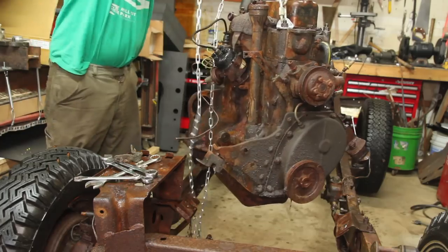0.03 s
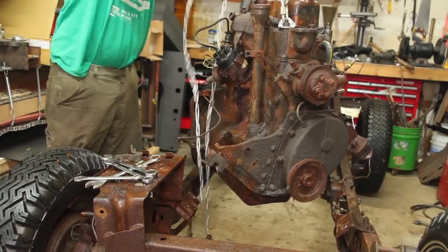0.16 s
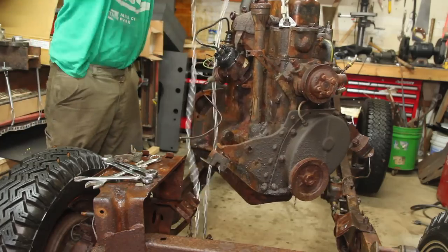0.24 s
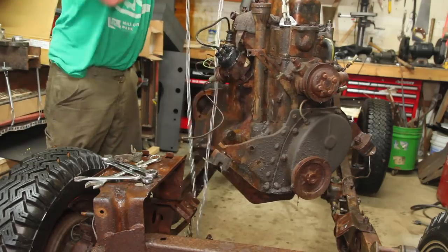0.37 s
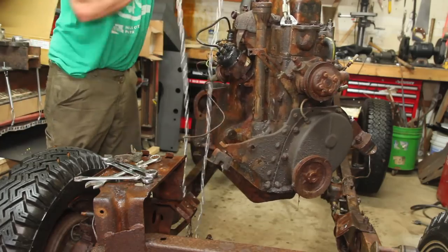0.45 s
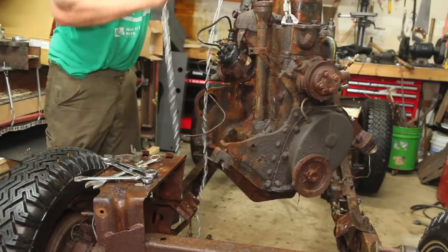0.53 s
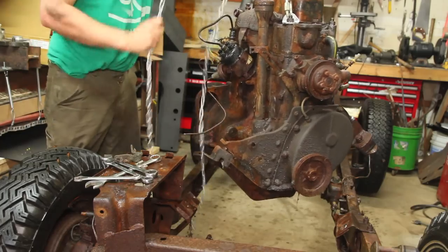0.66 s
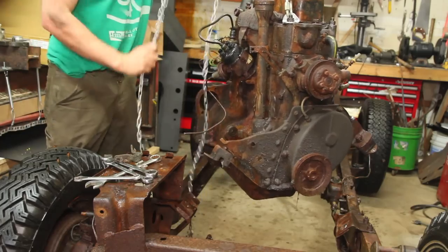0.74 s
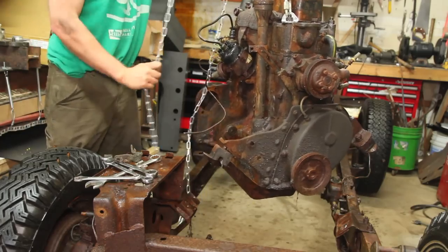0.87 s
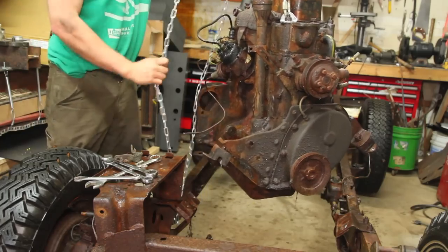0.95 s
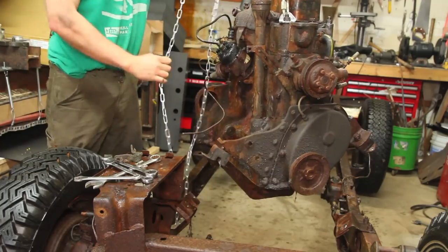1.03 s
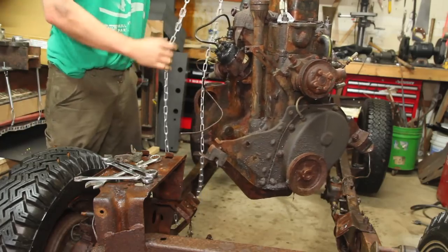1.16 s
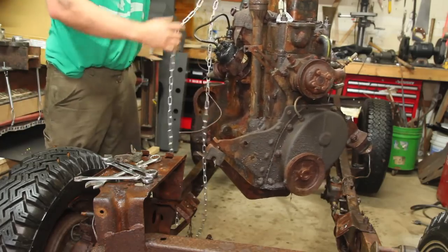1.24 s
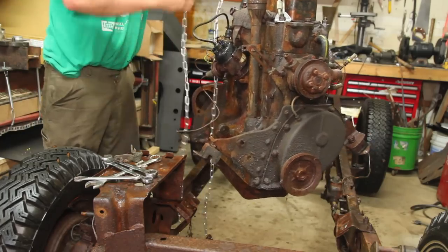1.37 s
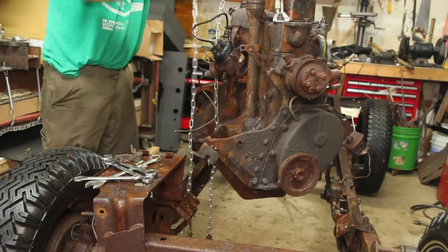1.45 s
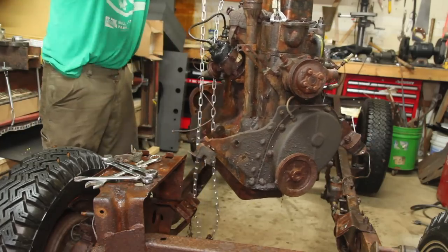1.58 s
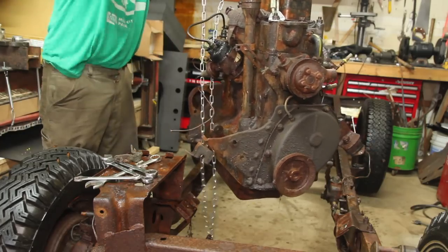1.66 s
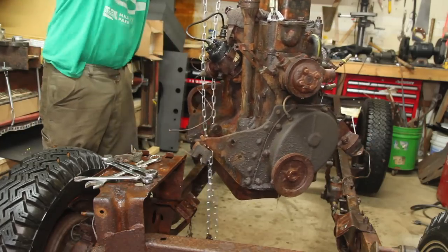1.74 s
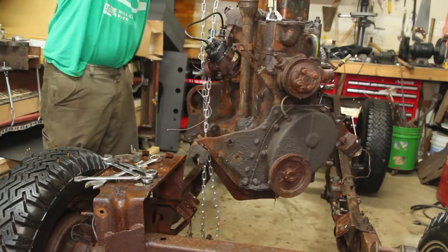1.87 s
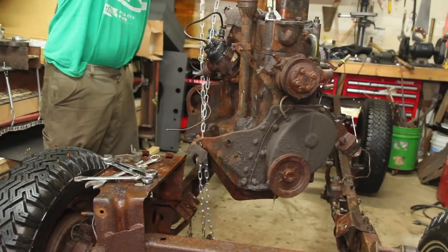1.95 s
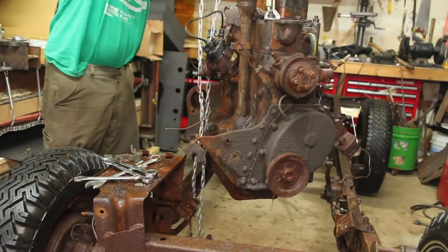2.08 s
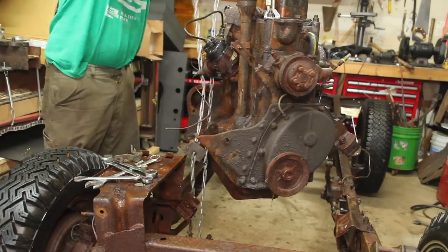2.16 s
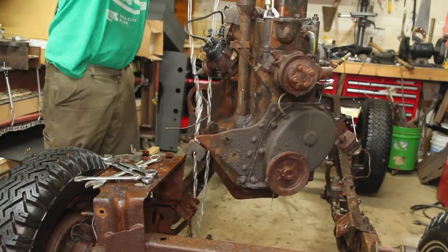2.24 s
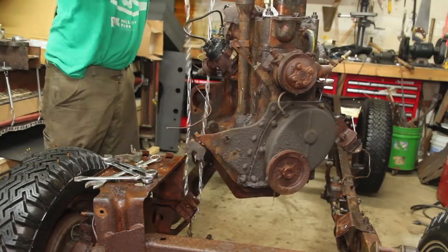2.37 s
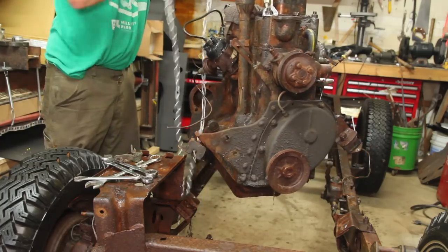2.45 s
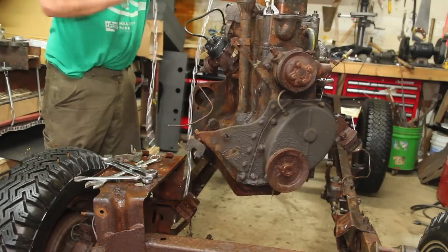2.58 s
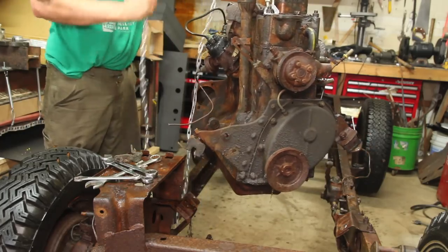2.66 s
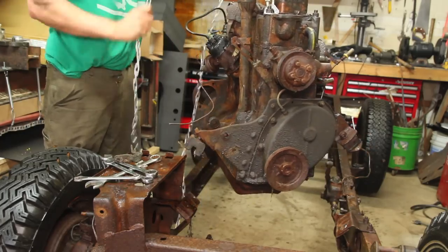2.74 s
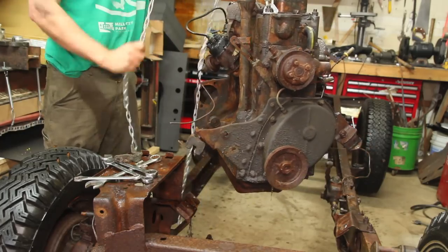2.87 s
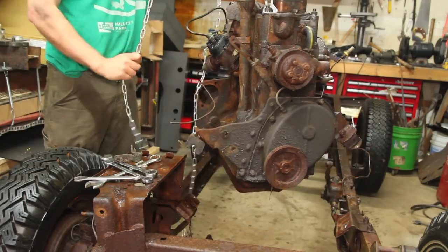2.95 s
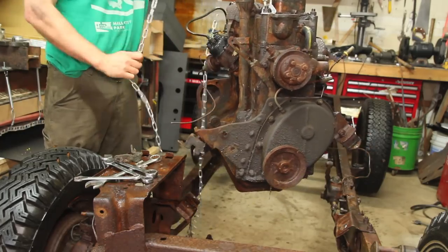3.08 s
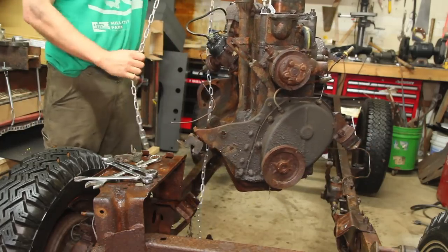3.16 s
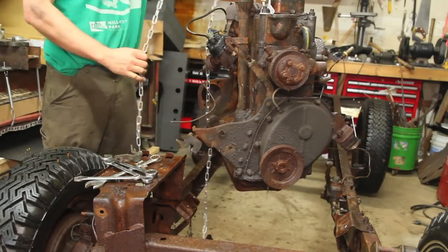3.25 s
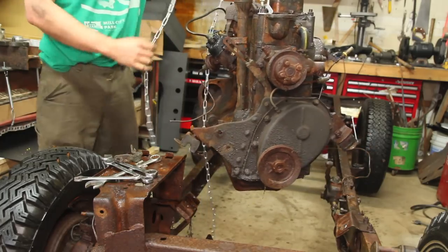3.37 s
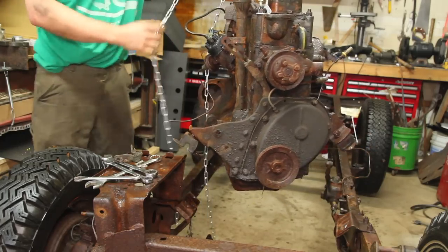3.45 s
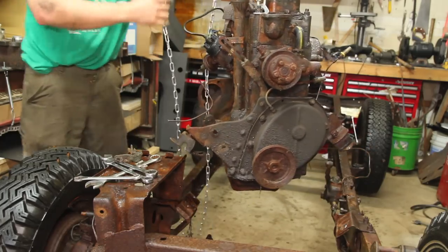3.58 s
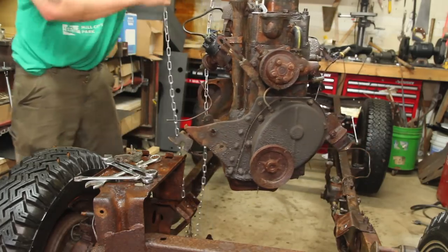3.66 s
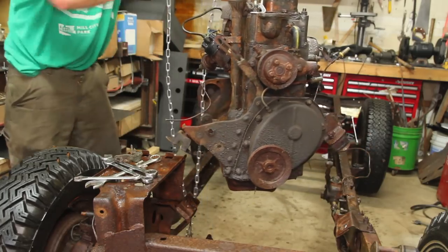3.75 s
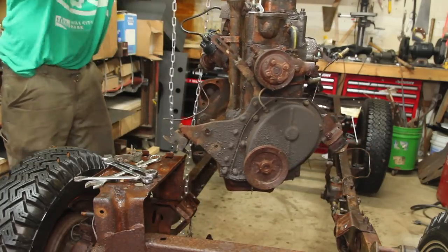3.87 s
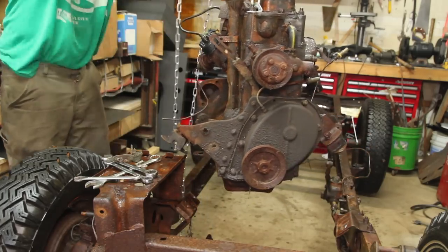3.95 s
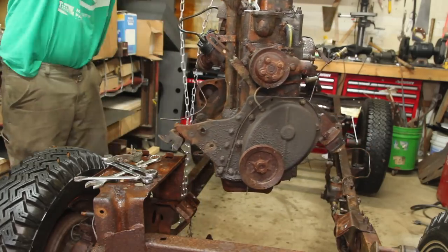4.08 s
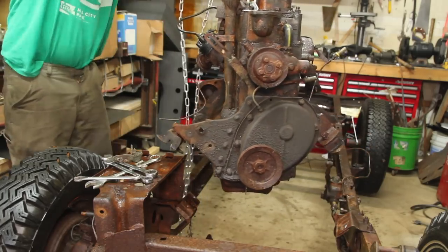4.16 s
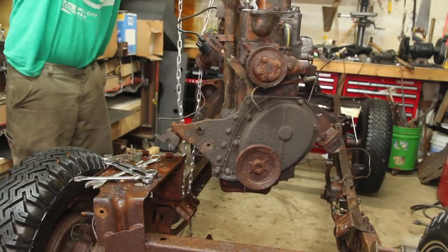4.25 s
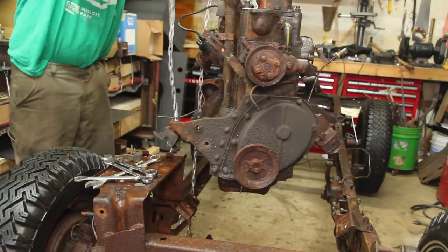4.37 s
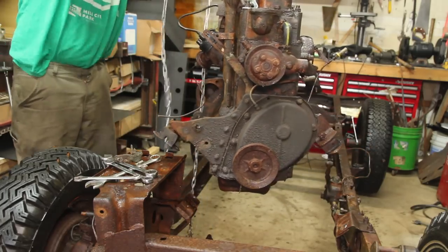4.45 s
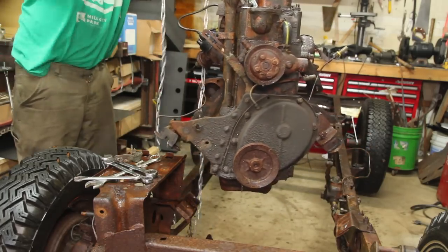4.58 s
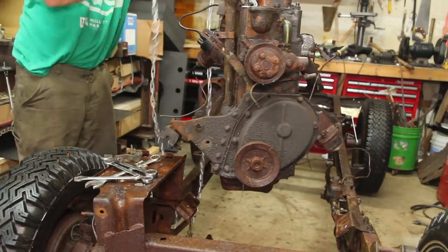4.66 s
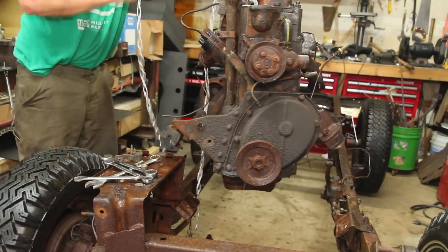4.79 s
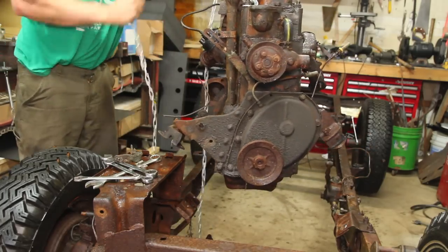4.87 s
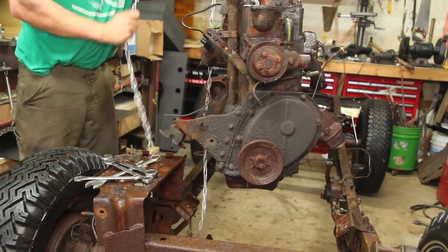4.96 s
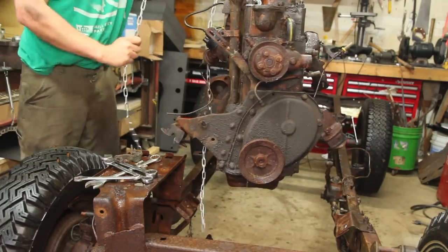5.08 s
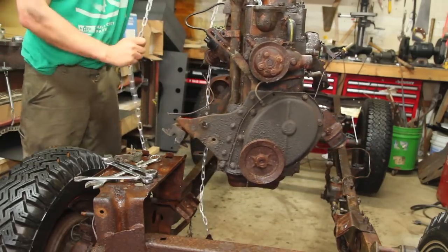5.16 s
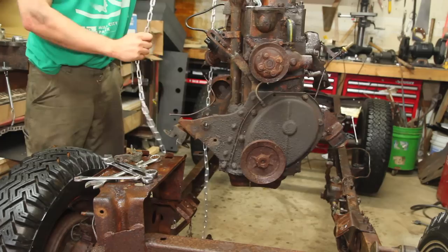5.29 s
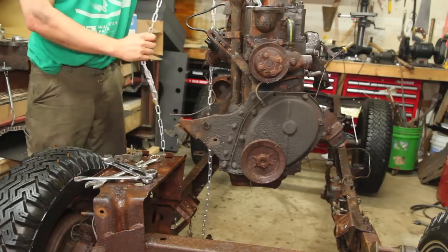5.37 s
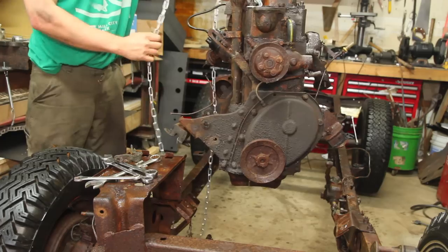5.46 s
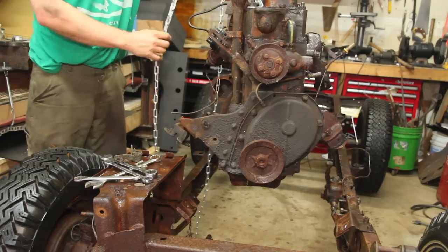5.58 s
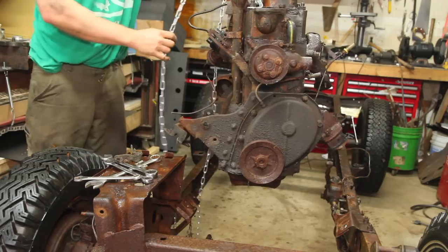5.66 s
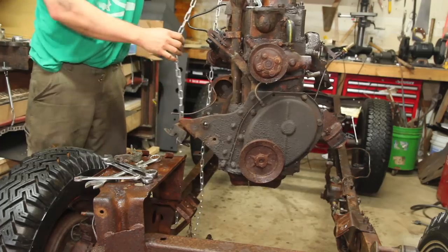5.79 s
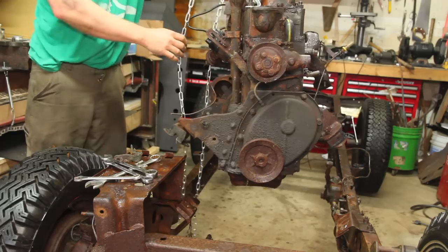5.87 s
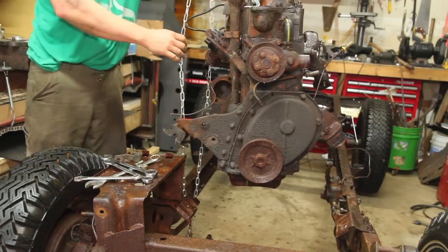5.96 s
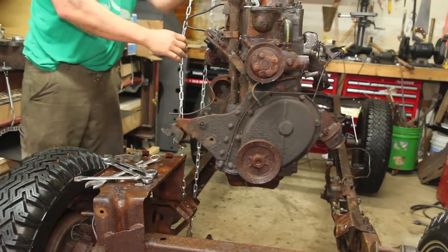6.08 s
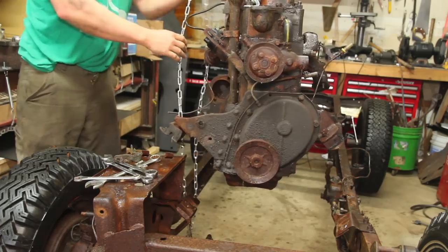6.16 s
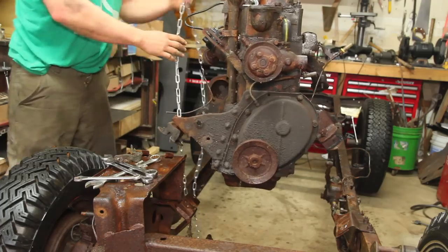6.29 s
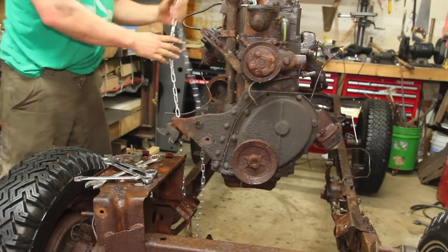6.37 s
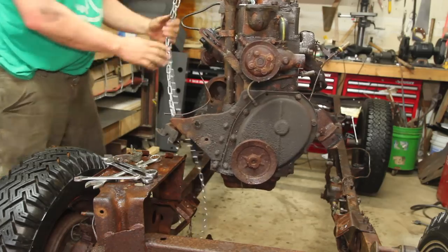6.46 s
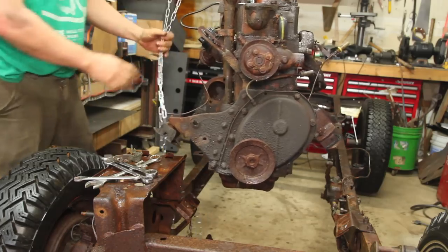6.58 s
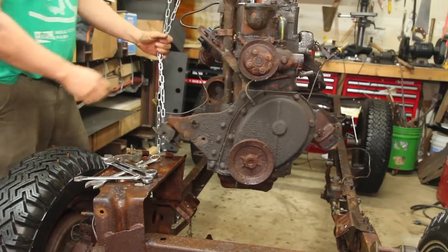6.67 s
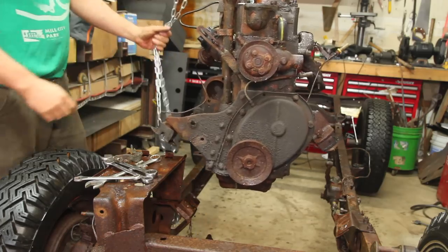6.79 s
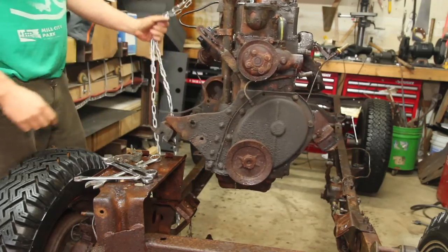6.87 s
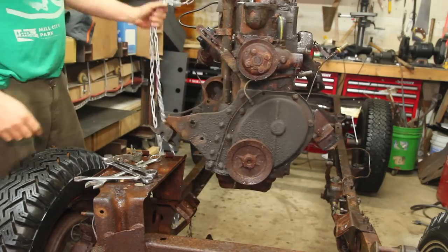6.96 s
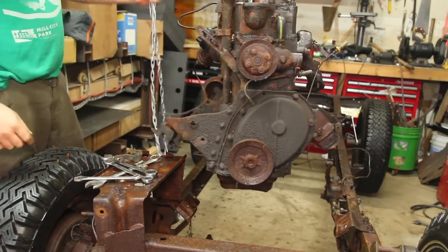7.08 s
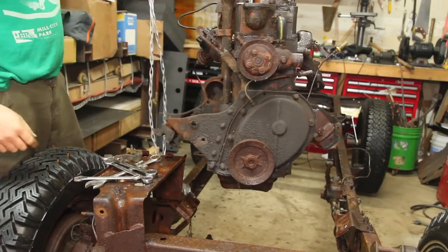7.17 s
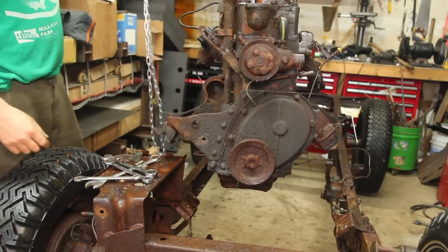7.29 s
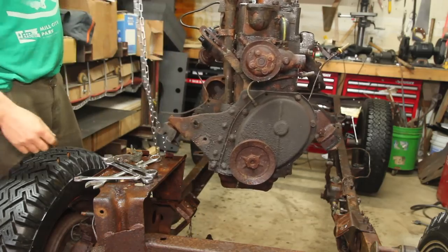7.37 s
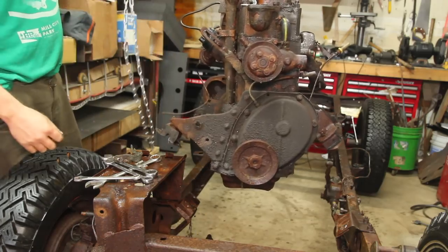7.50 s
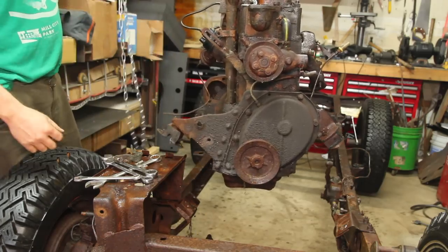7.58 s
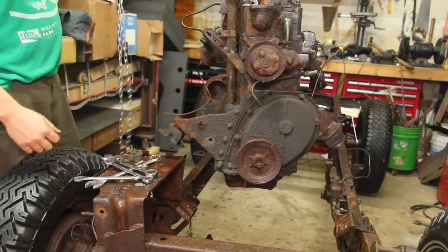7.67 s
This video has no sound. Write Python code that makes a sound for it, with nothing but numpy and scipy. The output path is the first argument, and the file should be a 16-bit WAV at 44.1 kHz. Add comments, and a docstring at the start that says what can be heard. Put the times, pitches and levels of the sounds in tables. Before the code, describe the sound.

In a reverberant workshop, a hand chain is hauled through a manual hoist in three loud, fast bursts of about a second each, links clacking and grinding over a low beam rumble. Between bursts, loose chain clinks, brushes and slaps a ringing steel frame, and the hoist ticks faintly. The last pause is longest, full of small chain rattles. The microphone is fairly close, with quiet room noise.

```python
"""In a workshop, a hand chain is hauled three times through a chain hoist.
Links clack into the pocket wheel: noise cracks and struck modes ring the hoist, over a bed of grinding.
The beam above rumbles and sways as resonant noise; quiet room noise carries a faint sine whine.
Slack chain slaps and brushes a ringing steel frame, its links clink, and the unloaded hoist ticks.
Short room reverberation surrounds hoist and chain."""
import sys
import numpy as np
from scipy import signal
from scipy.io import wavfile
from scipy.ndimage import uniform_filter1d

SR = 44100
rng = np.random.default_rng(int(sys.argv[2]) if len(sys.argv) > 2 else 0)


def wav_out(sig):
    """Save sig, one row per channel (or a flat mono array), as 16-bit PCM at SR to the path in sys.argv[1]."""
    wavfile.write(sys.argv[1], SR, np.round(np.clip(np.atleast_2d(sig).T, -1, 1) * 32767).astype(np.int16))


N = 340891  # samples

# Levels in the tables are relative: each source sets its own place in the mix.
# One table a haul: time_s, links_passed (over the wheel, rounded when used), blow_db, grind_db
HAULS = [
    [(0, -1, -30, -33), (.042, -0.5, -17, -35.5), (.1356, 1, -19, -40.5), (.1632, 2.5, -15, -41),
     (.1847, 3, -14, -36), (.2201, 4.5, -15, -33.5), (.3323, 12, -19, -23), (.527, 25, -16, -25),
     (.6514, 32.5, -16.5, -22.5), (.7273, 38, -18, -22), (.8204, 43, -19.5, -24.5), (.885, 45.5, -22, -32),
     (.97, 47.5, -42, -49), (1.15, 50, -60, -79)],
    [(2.1222, 0, -19.5, -54), (2.155, 1, -17.5, -41), (2.186, 2, -15, -37), (2.2087, 2.5, -15, -30),
     (2.2505, 4.5, -16, -28), (2.4076, 14, -18, -26), (2.5732, 23, -16, -26.5), (2.7707, 33, -17, -28.5),
     (2.867, 36.5, -14.5, -24), (2.9062, 38.5, -16.5, -25.5), (2.9647, 41, -15.5, -26.5),
     (3.0144, 43, -22.5, -39), (3.2, 44.5, -60, -66.5)],
    [(4.3421, 0, -21, -52.5), (4.4012, 1, -19, -36), (4.4322, 2, -18, -38), (4.4839, 4, -18.5, -26.5),
     (4.5454, 7, -18, -21.5), (4.6286, 12.5, -18.5, -21), (4.741, 17.5, -17, -25), (4.906, 26, -19, -24.5),
     (5.0159, 31, -16.5, -29.5), (5.068, 33, -16, -23), (5.126, 35, -20, -47), (5.1794, 36.5, -38, -47),
     (5.25, 36, -60, -51.5)],
]
# Hoist resonances under load: centre_hz, width_hz (nominal), level_db
LOADED_HOIST = [(2497, 280, -10), (3278, 130, -10.5), (4340, 330, -2), (5280, 180, -6), (5790, 260, 1),
                (6647, 96, -4), (7280, 200, -5), (8170, 290, -2.5), (8770, 54, -7.5), (8990, 80, -6),
                (9600, 67, -10.5), (10930, 370, -14), (12860, 300, -10), (13930, 350, -6), (14680, 250, -7)]
# Steel on steel, spectrum: freq_hz, level_db (per Hz)
CRACK_SPECTRUM = [(180, -34.5), (300, -13.5), (412, -13.5), (994, -8.5), (2740, -11.5), (2980, -8),
                  (4230, -9), (4830, -7.5), (5800, -7), (16000, -3)]
SEAT_JITTER_S, SEAT_UNEVEN_DB = .0015, 2  # no two links seat alike

# Blows that ring the frame: start_s, main_db, lower_db, upper_db
FRAME_BLOWS = [(0.055, -41.5, -37, -52.5), (.2554, -28.5, -36.5, -30), (.3724, -34, -27, -35),
               (0.4156, -35.5, -34.5, -34.5), (0.5297, -25, -38.5, -21.5), (.6444, -34, -30, -37),
               (.6894, -27.5, -37.5, -32), (.9167, -30, -58, -50), (0.9685, -29, -48.5, -39),
               (1.0214, -42, -38.5, -39.5), (1.1404, -62.5, -44.5, -53.5), (1.215, -36, -61, -56),
               (1.3443, -48, -45, -38), (1.3961, -59, -45.5, -64.5), (1.7641, -54.5, -49, -51),
               (2.0073, -63, -43, -60), (2.0942, -38.5, -42.5, -42.5), (2.2451, -41.5, -39.5, -29.5),
               (2.3033, -46.5, -32, -33.5), (2.5658, -41, -30.5, -24.5), (2.6315, -15, -51.5, -35),
               (2.6916, -27.5, -37, -38), (2.7652, -30, -37.5, -36.5), (2.8347, -29, -45, -28.5),
               (2.8901, -19.5, -51, -23), (2.943, -47, -43, -30.5), (3.0088, -30, -51, -47),
               (3.4124, -34, -54.5, -35), (3.46, -37.5, -61, -42), (3.538, -48, -44.5, -45),
               (3.9, -37, -35.5, -31), (3.9931, -33.5, -39, -35), (4.4044, -55.5, -38, -52),
               (4.4907, -33, -41, -32.5), (4.5325, -15, -46, -36), (4.5832, -24.5, -55, -40),
               (4.6745, -24.5, -50, -32.5), (4.7969, -21.5, -37.5, -31), (4.945, -33, -49.5, -35.5),
               (5.0369, -35, -34, -36.5), (5.2869, -31.5, -42, -30.5), (5.6605, -36, -56, -47),
               (5.7588, -35.5, -46, -43.5), (6.6591, -33, -43, -37), (6.731, -33, -42, -41),
               (6.7533, -31, -41, -43.5), (6.8174, -33, -45, -41), (6.8995, -44, -40, -44),
               (6.959, -52, -40, -41), (7.0222, -18, -42, -34), (7.0891, -55, -41.5, -46)]
# Frame modes: pitch_hz, level_db, t60_s
FRAME_MODES = [(520, -10, .12), (775, -7, .2), (850, -4, .24), (870, -4, .2), (960, -7, .15),
               (1050, -10, .08), (1072, 0, .17), (1097, -10, .08), (1205, -6, .12), (1263, -6, .12),
               (1370, -3, .15), (1560, -6, .1)]
# Each passing link taps the frame, relative to its blow: main_db, lower_db, upper_db
LINK_TAPS_DB = [-29, -30, -27]

# Resonances of the beam, then of its slow sway: centre_hz, width_hz (nominal), level_db
BEAM_MODES = [(27.8, 11, -5), (51.6, 15, -20), (82.6, 20, -3), (109.5, 5, -9), (140, 10.5, 1),
              (194.7, 14, -4), (233.5, 10, -6.5), (269.5, 55, -11.5)]
SWAY_MODES = [(10.3, 4, 3.5), (20, 10, -21.5)]
# Pulls on the beam and rebounds once the chain is let go: start_s, full_s, eased_s, rumble_db, sway_db
LOADS = [(.0, 0.048, 0.11, -40, -49), (.1, 0.21, 0.86, -35, -44), (1.0, 1.037, 1.096, -37.5, -44),
         (1.55, 1.633, 1.52, -50, -54), (1.75, 1.826, 1.83, -58, -50), (2.125, 2.235, 2.98, -35.5, -41.5),
         (3.02, 3.046, 3.11, -41, -50), (4.336, 4.51, 5.13, -36, -38.5), (5.26, 5.31, 5.36, -37.5, -36),
         (5.998, 6.423, 6.6, -55, -48)]
# Rumble left under the loads: time_s, level_db
RUMBLE_REST = [(0, -57.5), (4, -64.5), (6.8, -63), (7.73, -84)]
LOAD_RISE_DB, RUMBLE_FALL_DB_PER_S, SWAY_FALL_DB_PER_S = 18, 138, 13
SURGE_DB = 1.5
TUG_DB_PER_S, TUG_S = 5.5, 0.069  # tug height per second of pull, tug width

# Room noise spectrum: freq_hz, level_db (per Hz)
AIR_SPECTRUM = [(40, -18.5), (70, 1), (146, -11.5), (334, -0.5), (870, -6.5), (1220, -8.5), (4000, -16.5),
                (9000, -20), (16000, -26.5)]
AIR_DB, WHINE_HZ, WHINE_DB = -62, 1033, -69

# Link on link: start_s, blow_db, tick_db (relative to the blow)
CLINKS = [(.0189, -30, 6), (.2892, -19, -5), (.3775, -11, -5.5), (0.4785, -9, -5), (.7986, -20, 0),
          (.9991, -38, 8), (1.0794, -18.5, -19), (1.272, -43, -13), (1.3004, -31, -16),
          (1.3882, -39, -18.5), (1.4232, -35, -20.5), (1.4511, -44, -17.5), (1.6033, -44.5, -6),
          (1.633, -36, -15.5), (1.7414, -43, -13.5), (1.877, -31, -14), (1.8876, -29.5, -25.5),
          (1.9999, -40, -21), (2.1004, -29.5, -2), (2.2697, -24, -1), (2.7511, -24, -7), (3.3273, -47, -16),
          (3.4595, -43, -4), (3.7483, -30, -15), (3.7555, -27, -22.5), (3.8594, -54, 3), (3.9135, -42, -4),
          (3.9699, -40, -13.5), (4.0272, -39, -16), (4.1654, -39.5, -18), (4.1849, -36.5, -19),
          (4.342, -23, 7), (5.0429, -24, -5.5), (5.1267, -21, 8), (5.3048, -41.5, 6), (5.676, -48.5, -21),
          (5.8046, -51, -2), (5.8885, -61, 12), (6.1619, -45, -19), (6.2941, -37, -10), (6.331, -44, -16.5),
          (6.346, -27.5, -16), (6.4044, -33.5, -5), (6.504, -44.5, -11.5), (6.567, -50, 3),
          (6.5777, -40.5, 10), (6.6792, -40.5, 8), (6.7311, -36, -8.5), (6.8658, -34, 0), (6.8922, -28, -9),
          (6.9431, -32, -16.5), (6.979, -33, -8.5), (7.0194, -34, 2.5), (7.1132, -23, -12.5),
          (7.22, -36, -13), (7.2469, -26.5, -14), (7.443, -42, -15), (7.4634, -38, -22), (7.4781, -20, -30),
          (7.5499, -42, -8.5), (7.6585, -44.5, -19), (7.7059, -39, -16)]
# Link modes: centre_hz, level_db, t60_s
LINK_MODES = [(15100, -8, .04), (15270, -3, .07), (15350, -4, .09), (15480, 3, .015), (15620, -3, .07),
              (15710, -5, .07)]
# Contact tick of a clink, spectrum: freq_hz, level_db (per Hz)
CLINK_TICK_SPECTRUM = [(3000, -26.0), (8000, -1.0), (15000, -1.5)]
# Small touches: level relative to the clink or seating blow, time constant, and level at rest
AFTER_CLINK_DB, AFTER_CLINK_S, AFTER_SEAT_DB, AFTER_SEAT_S, REST_DB = -9, .025, -22.5, .03, -69

# Slack chain on the frame: start_s, blow_db, treble_db and thud_db (relative to the blow), decay_s
SLAPS = [(1.0186, -27, -1, -10, 0.028), (1.2133, -31, -0.5, -22, 0.014), (1.3428, -38.5, -13, -21, 0.015),
         (1.5803, -32, -1.5, -16, 0.0075), (1.7596, -42.5, -22.5, -19, 0.024),
         (1.842, -48, 2, -17.5, 0.0083), (2.0934, -32.5, 0, -16.5, 0.022), (3.277, -41, 4.5, -29, 0.01),
         (3.371, -46.5, 7.5, -18.5, 0.015), (3.4065, -40, -15, -27.5, 0.044),
         (3.447, -33, -4.5, -24, 0.0184), (3.5038, -34.5, 1, -24, 0.017), (3.537, -38, 1.5, -22.5, 0.015),
         (3.8878, -35.5, 5.5, -33, 0.018), (3.907, -22.5, -18, -36, 0.01), (3.99, -34, -12, -18.5, 0.019),
         (4.264, -36.5, -23.5, -34, 0.017), (4.3124, -35, 1, -19, 0.034), (5.2755, -38, 5, -29, 0.0116),
         (5.2812, -27, 12, -26, 0.013), (5.2914, -25, -2, -13, 0.012), (5.3144, -30, -9, -7, 0.013),
         (5.5333, -39.5, 0, -22, 0.021), (5.657, -41, -25.5, -23, 0.016), (5.758, -41, -22.5, -28, 0.0147),
         (6.302, -45.5, -18, -19, 0.023), (6.349, -48, -5, -8, 0.015), (6.408, -59.5, 3.5, -8.5, 0.013),
         (6.654, -30.5, 1, -29, 0.0136), (6.6797, -27, 2.5, -32, 0.013), (6.728, -23, -10, -32, 0.016),
         (6.832, -34.5, 0, -14, 0.013), (6.8681, -37, -0.5, -8.5, 0.013), (6.8935, -34.5, -4, -13, 0.01),
         (6.9485, -41, -9, -20.5, 0.015), (6.986, -33.5, -5, -26, 0.017), (7.0184, -21, 5.5, -37, 0.016),
         (7.034, -24, -23.5, -37, 0.019), (7.0872, -28, 3.5, -40, 0.021), (7.12, -40, 0, -32.5, 0.015),
         (7.2424, -54, -1, -17, 0.021)]
# Dull body, bright edge and landing weight of the chain, spectra: freq_hz, level_db (per Hz)
BODY_SPECTRUM = [(180, -39), (300, -29), (520, -27.5), (830, -11.5), (1070, -10), (1900, -11.5),
                 (2700, -9.5), (3300, -11), (4500, -10), (7000, -23.5), (16000, -41.5)]
EDGE_SPECTRUM = [(1500, -54), (3000, -7), (6000, 3.5), (9000, 0), (13000, -10), (16000, -5)]
THUD_SPECTRUM = [(120, -36), (250, -5), (520, 3.5), (750, -3), (1200, -41)]
# Thin edges of the frame, modes: centre_hz, level_db, t60_s
FLANGE_MODES = [(2260, -6, .05), (2590, 0, .06), (2820, 0, .06), (3500, -4, .05), (4290, -3, .05),
                (4650, -2, .05), (5080, -4, .04), (5900, -4, .04), (6550, -6, .04), (7500, -8, .04)]
# One table a pause, chain brushing the frame: time_s, level_db, treble_db (relative to level)
DRAG = [
    [(.9, -39, 2), (1.0, -33, -6), (1.05, -34.5, -5), (1.2, -51.5, -11), (1.26, -45.5, -12),
     (1.42, -58.5, -8), (1.72, -63, -14), (2.09, -49.5, -12)],
    [(3.0, -49, 19), (3.04, -53, 21), (3.126, -54, 0), (3.3, -62, -9), (3.53, -64, 8), (3.74, -70, -7),
     (4.02, -68, 2), (4.13, -63, -30), (4.3, -60, 10)],
    [(5.15, -41, 5), (5.26, -42, -1.5), (5.37, -58, 14), (5.53, -65, -10), (5.7, -46.5, -24),
     (5.91, -61.5, -7), (6.26, -77, -13), (6.5, -61, -12), (6.82, -46.5, -14), (7.03, -43.5, 1),
     (7.24, -70.5, 11), (7.5, -77, -3)],
]

# Knocks in the unloaded hoist: start_s, blow_db, upper_db (upper modes, relative to the blow)
TICKS = [(1.6094, -54.5, -10.5), (1.759, -51.5, -22.5), (1.783, -43, -21), (1.9582, -40, -9),
         (2.01, -46, -26), (2.0385, -39.5, -26), (3.1, -42, -15), (3.2076, -43, -18), (3.242, -50, -14),
         (3.691, -50, -14), (3.7933, -53, -15), (4.2188, -51.5, -15.5), (4.24, -36.5, -18),
         (5.8285, -44, -5), (5.875, -41.5, -3), (6.075, -44, -13), (6.132, -50.5, -6), (6.2295, -47, -6.5),
         (6.3345, -51.5, -10), (6.4796, -51, -12.5), (6.5783, -59, 7)]
# Groups of close modes in the idle hoist: centre_hz, level_db, t60_s
IDLE_HOIST = [(2180, -14, .06), (2650, -12, .06), (3680, -8, .06), (4230, -1, .07), (4540, -1, .07),
              (4950, -4, .06), (5330, -4, .05), (6650, -3, .12), (7700, -5, .07), (8200, -2, .09),
              (9100, -4, .09), (9490, -4, .09), (11250, -1, .09), (13700, -8, .06)]
# Click of a knock, spectrum: freq_hz, level_db (per Hz)
KNOCK_CLICK_SPECTRUM = [(1500, -15.5), (4300, 0.5), (5500, 1), (7000, -16.0), (15000, -23.0)]
# One table a pause, the swinging chain stirring the idle hoist: time_s, level_db
STIR = [
    [(1.1, -62), (1.374, -75), (1.428, -80), (1.656, -78), (1.778, -71), (2.046, -65.5), (2.1, -56)],
    [(3.05, -54), (3.096, -38), (3.222, -66.5), (3.39, -61), (3.514, -48), (3.72, -74.5), (3.9, -75.5)],
    [(4.15, -77), (4.282, -72), (4.33, -57)],
    [(5.5, -63.5), (5.61, -68), (5.748, -76), (5.882, -85), (6.076, -78), (6.158, -76), (6.28, -80),
     (6.6, -70)],
]

# Workshop reverberation: freq_hz, t60_s
SHOP_DECAY = [(250, 0.43), (1000, 0.37), (4000, 0.3), (9000, 0.29), (15000, 0.19)]
CEILING, BAND_LIMIT_HZ = 0.51, 15850  # ceiling as a full-scale fraction


def gain_of(db):
    """Turns dB into an amplitude factor."""
    return 10 ** (np.asarray(db) / 20)


def evened(x):
    """Scales to rms 1."""
    return x / np.sqrt(np.mean(x ** 2) + 1e-20)


def curve(rows, column=1):
    """Fades along a dB column of a table, at -150 dB outside its times."""
    rows = np.array(rows)
    return gain_of(np.interp(np.arange(N) / SR, rows[:, 0], rows[:, column], -150, -150))


def coloured(x, spectrum):
    """Shapes a sound with a causal minimum-phase filter of unit energy."""
    hz = np.abs(np.fft.fftfreq(4096, 1 / SR))
    f, db = np.transpose(spectrum)
    shape_db = np.interp(np.log(hz + 1), np.log(f + 1), db)
    log_gain = np.log(gain_of(np.maximum(shape_db, -100)))
    taps = np.fft.ifft(np.exp(np.conj(signal.hilbert(log_gain)))).real[:2048]
    return signal.oaconvolve(x, taps / np.linalg.norm(taps))[:N]


def ring(x, hz, t60):
    """Excites one decaying mode: an impulse of 1 rings with a height near 1."""
    radius = 10 ** (-3 / (abs(t60) * SR))
    turn = 2 * np.pi * hz / SR
    return signal.lfilter([np.sin(turn)], [1, -2 * radius * np.cos(turn), radius ** 2], x)


def as_modes(peaks):
    """Turns resonances into modes: a wide one dies faster and needs a harder strike."""
    return [(hz, db + 10 * np.log10(width / 100), 2.67 / width) for hz, width, db in peaks]


def split(modes, spread):
    """Makes each mode three uneven neighbours, since a metal part never rings on one clean tone."""
    return [(hz * (1 + spread * step), db, t60) for hz, db, t60 in modes for step in (-1, .15, .8)]


def struck(s, size, modes, uneven_db, swell_s=0.00097):
    """Lands every blow on another spot, sharing its force among the modes anew; the ring takes time to build."""
    at = np.clip((np.asarray(s) * SR).astype(int), 0, N - 1)
    share = np.clip(rng.standard_normal((len(at), len(modes))), -2, 2)
    size = np.asarray(size).reshape(len(at), -1) * np.ones(share.shape)
    out = np.zeros(N)
    for k, (hz, db, t60) in enumerate(modes):
        sign = np.sign(share[:, k - 1])
        blows = np.bincount(at, size[:, k] * sign * gain_of(uneven_db * share[:, k]), N)
        swell = 2 * np.log(1000) / (swell_s * SR) * ring(blows, hz, swell_s)
        out += gain_of(db) * ring(swell, hz, t60)
    return out


def touches(per_s, spread_db):
    """Scatters random times and sizes of small contacts."""
    s = np.flatnonzero(rng.random(N) < per_s / SR) / SR
    return s, gain_of(spread_db * np.minimum(rng.exponential(1, len(s)), 4))


def bursts(s, size, decay_s):
    """Starts noise at each blow; its amplitude dies with its own time constant."""
    t, power = np.arange(4000) / SR, np.zeros(N + 4000)
    attack = np.minimum(t / 0.0013, 1)
    for start, height, decay in zip(s, size, decay_s * np.ones(len(s))):
        power[int(start * SR):][:4000] += height ** 2 * np.exp(-2 * t / max(decay, .001)) * attack
    return np.sqrt(power[:N]) * rng.standard_normal(N)


def fading(s, db, decay_s):
    """Power that jumps at each blow and dies with one amplitude time constant."""
    power = np.bincount((s * SR).astype(int), gain_of(2 * db), N)
    return signal.lfilter([1], [1, -np.exp(-2 / (abs(decay_s) * SR))], power)


def seated():
    """Times (s) and levels (dB) of the links dropping into the pockets of the wheel."""
    hauls = []
    for haul in HAULS:
        s, passed, db, _ = np.transpose(haul)
        passed = np.round(passed)
        link = np.arange(60)
        chance = rng.standard_normal((60, 2))
        chance *= np.minimum(link / 4, 1)[:, None]  # the first slow links seat cleanly
        seat_s = np.interp(link, passed, s) + SEAT_JITTER_S * chance[:, 0]
        # links beyond the haul are silenced
        seat_db = np.interp(link, passed, db, right=-150) + SEAT_UNEVEN_DB * chance[:, 1]
        hauls.append([seat_s, seat_db])
    return np.hstack(hauls)


def hoist(s, db):
    """Links seat in the wheel with a crack and ring the housing; between them the chain grinds."""
    modes = split(as_modes(LOADED_HOIST), spread=.012)
    bump_s = (s[:, None] + rng.uniform(0, .005, (len(s), 3))).ravel()  # a link settles in three bumps
    clack = gain_of(-17) * struck(bump_s, np.repeat(gain_of(db), 3), modes, uneven_db=3.5)
    crack = gain_of(-3.5) * coloured(bursts(s, gain_of(db), 0.0094), CRACK_SPECTRUM)
    small_s, small = touches(per_s=900, spread_db=0.5)
    grit = coloured(bursts(small_s, small, 0.0024), CRACK_SPECTRUM)
    grind = evened(struck(small_s, small, modes, uneven_db=6.5)) + gain_of(2.5) * evened(grit)
    grind_level = sum(curve(haul, column=3) for haul in HAULS)
    return clack + crack + gain_of(-7.0) * grind * grind_level


def frame_ring(seats):
    """The steel frame rings from blows and passing links; where it is hit decides which tones speak."""
    s, *tone_db = np.transpose(FRAME_BLOWS)
    seat_s, seat_db = seats
    hz = np.array(FRAME_MODES)[:, 0]
    group = np.where(hz < 1000, 1, np.where(hz > 1150, 2, 0))  # 0 main, 1 lower, 2 upper
    blow_db = np.array(tone_db)[group].T
    tap_db = seat_db[:, None] + np.array(LINK_TAPS_DB)[group]
    uneven_db = np.r_[1.5 * np.ones(len(s)), 5 * np.ones(len(seat_s))]
    size = gain_of(np.vstack([blow_db, tap_db]))
    return gain_of(-5.5) * struck(np.r_[s, seat_s], size, FRAME_MODES, uneven_db, swell_s=0.03)


def load(column, fall_db_per_s):
    """Gain that rises, holds and falls for every load on the beam; a long pull ends in a harder tug."""
    t, power = np.arange(0, N / SR + .01, .005), 0
    for row in LOADS:
        start, full, eased = row[:3]
        rise = LOAD_RISE_DB * np.maximum(full - t, 0) / max(full - start, .01)
        tug = TUG_DB_PER_S * (eased - full) * np.exp(-((t - eased) / TUG_S) ** 2)
        fall = fall_db_per_s * np.maximum(t - eased, 0)
        power = power + gain_of(2 * (row[column] - rise + tug - fall))
    return np.interp(np.arange(N) / SR, t, np.sqrt(power))


def resonant_noise(peaks):
    """Noise rung through each resonance and mixed to rms 1."""
    return evened(sum(gain_of(db) * evened(ring(rng.standard_normal(N), hz, 2.8 / width))
                      for hz, width, db in peaks))


def beam():
    """The haul shakes the beam that carries the hoist: low modes that surge, and a slow sway."""
    rumble, sway = resonant_noise(BEAM_MODES), resonant_noise(SWAY_MODES)
    surge = gain_of(SURGE_DB * evened(uniform_filter1d(rng.standard_normal(N), size=3000)))
    loaded = surge * load(column=3, fall_db_per_s=RUMBLE_FALL_DB_PER_S)
    rumble_level = np.hypot(loaded, curve(RUMBLE_REST))
    return rumble * rumble_level + sway * load(column=4, fall_db_per_s=SWAY_FALL_DB_PER_S)


def air():
    """Quiet room noise with a faint steady whine."""
    whine = gain_of(WHINE_DB) * np.sin(2 * np.pi * WHINE_HZ * np.arange(N) / SR)
    return gain_of(AIR_DB) * coloured(rng.standard_normal(N), AIR_SPECTRUM) + whine


def links(seats):
    """Small steel links tick and ring near the top of hearing, each clink with its own balance of modes."""
    s, db, tick_db = np.transpose(CLINKS)
    seat_s, seat_db = seats
    modes = split(LINK_MODES, spread=.004)
    tick = coloured(bursts(s, gain_of(db + tick_db), 0.0036), CLINK_TICK_SPECTRUM)
    ping = ring(bursts(s, gain_of(db), 0.0022), 15500, .008)  # the contact itself, gone in a few ms
    small_s, small = touches(per_s=540, spread_db=-0.5)
    jingle = evened(struck(small_s, small, modes, uneven_db=7))
    after_clink = fading(s, db + AFTER_CLINK_DB, AFTER_CLINK_S)
    after_seat = fading(seat_s, seat_db + AFTER_SEAT_DB, AFTER_SEAT_S)
    jingle *= np.sqrt(after_clink + after_seat + gain_of(2 * REST_DB))
    clink = struck(s, gain_of(db), modes, uneven_db=4.5, swell_s=0.0074)
    return gain_of(-21) * clink + gain_of(-11) * ping + gain_of(-1.5) * tick + gain_of(-5) * jingle


def body_and_treble(make):
    """Colours one noise as the dull body of chain on frame and another as its bright edge."""
    return coloured(make(0), BODY_SPECTRUM) + gain_of(1.5) * coloured(make(1), EDGE_SPECTRUM)


def chain_on_frame():
    """The slack chain slaps and brushes the steel frame: noise bursts, thuds and ringing thin edges."""
    s, db, treble_db, thud_db, decay = np.transpose(SLAPS)

    def slap_noise(high):
        return bursts(s, gain_of(db + high * treble_db), decay * (1 - 0.38 * high))  # treble dies sooner

    slaps = body_and_treble(slap_noise)
    slaps += gain_of(1.5) * coloured(bursts(s, gain_of(db + thud_db), 2 * decay), THUD_SPECTRUM)
    slaps += gain_of(-13.5) * struck(s, gain_of(db), split(FLANGE_MODES, spread=0.016), uneven_db=3.5)
    small_s, small = touches(per_s=270, spread_db=5.0)
    patter = [evened(bursts(small_s, small, 0.005)) for _ in range(2)]

    def drag_noise(high):
        return patter[high] * sum(curve(rows) * curve(rows, column=2) ** high for rows in DRAG)

    return gain_of(-6) * slaps + gain_of(-7.5) * body_and_treble(drag_noise)


def idle_ticks():
    """Light knocks click and ring the idle hoist; the swinging chain keeps its lower modes stirring."""
    s, db, upper_db = np.transpose(TICKS)
    modes = split(IDLE_HOIST, spread=0.02)
    upper = np.array(modes)[:, 0] > 6000
    knocks = struck(s, gain_of(db[:, None] + np.outer(upper_db, upper)), modes, uneven_db=7.0)
    click = coloured(bursts(s, gain_of(db), 0.0046), KNOCK_CLICK_SPECTRUM)
    small_s, small = touches(per_s=100, spread_db=4.0)
    stir_size = np.outer(small, np.where(upper, .1, 1))
    stir = evened(struck(small_s, stir_size, modes, uneven_db=0.5)) * sum(curve(rows) for rows in STIR)
    return gain_of(-17.5) * knocks + gain_of(-6.5) * click + gain_of(-10.5) * stir


def tail():
    """Sparse reflections of random sign, each band dying at its own speed."""
    taps, at = np.zeros(SR // 2), np.arange(200, SR // 2 - 20, 20)
    taps[at + rng.integers(0, 20, len(at))] = rng.choice([-1., 1.], len(at))
    hz, t, bands = signal.stft(taps, SR, nperseg=256)
    f, t60 = np.transpose(SHOP_DECAY)
    band_t60 = np.interp(np.log(hz + 1), np.log(f), t60)[:, None]
    out = signal.istft(bands * gain_of(-60 * t / band_t60), SR, nperseg=256)[1]
    return out / np.linalg.norm(out)


def shop(x):
    """Room reverberation, averaged over three random sets of reflections that crossfade in turn."""
    turn = 2 * np.pi * 3 * np.arange(N) / SR  # three rounds a second
    wet = np.zeros(N)
    for k in range(3):
        share = np.sqrt((1 + np.cos(turn + k * 2 * np.pi / 3)) / 3)
        wet += signal.fftconvolve(x * share, tail())[:N]
    return wet


def scene():
    """Mixes all sources; the hoist overhead is wetter than the chain at the frame."""
    seats = seated()
    far = hoist(*seats) + idle_ticks()
    near = frame_ring(seats) + links(seats) + chain_on_frame()
    wet = shop(far + gain_of(-1.5) * near)
    return (far + near + wet + beam() + air())[None]


def record(dry):
    """Rounds peaks off softly below the ceiling, then limits the band."""
    soft = CEILING * np.tanh(dry / CEILING)
    lowpass = signal.firwin(511, BAND_LIMIT_HZ, window=("kaiser", 9), fs=SR)
    return signal.oaconvolve(soft, lowpass[None], "same")


dry = scene()
out = record(dry)
wav_out(out)
```